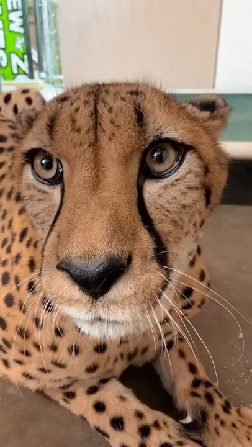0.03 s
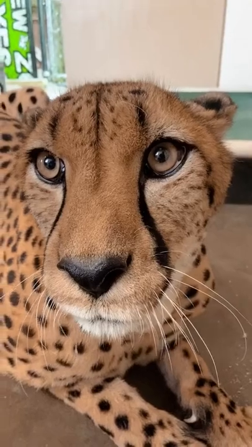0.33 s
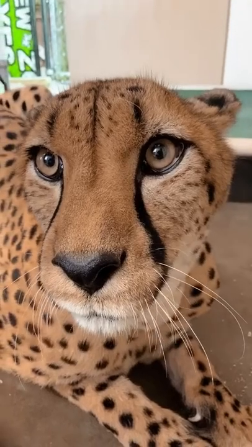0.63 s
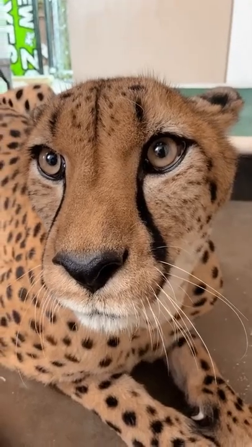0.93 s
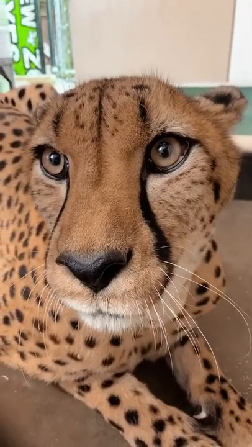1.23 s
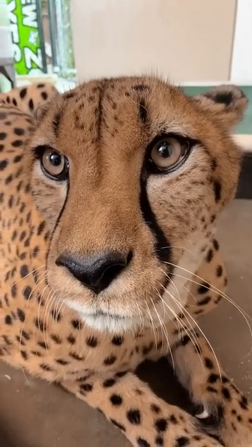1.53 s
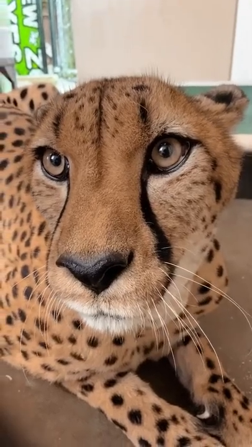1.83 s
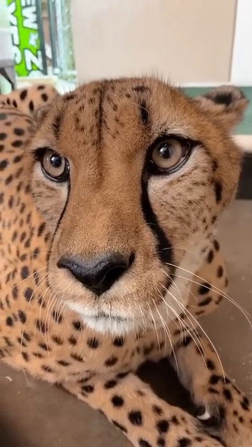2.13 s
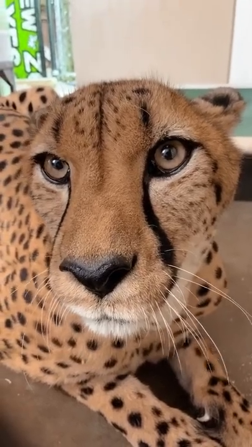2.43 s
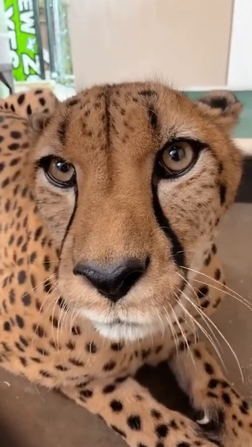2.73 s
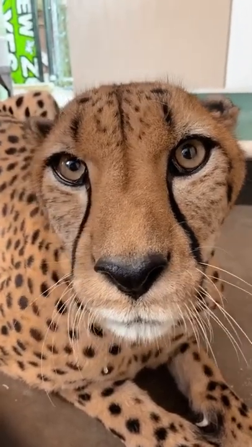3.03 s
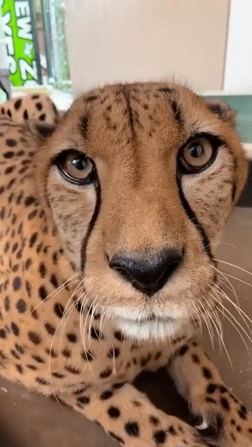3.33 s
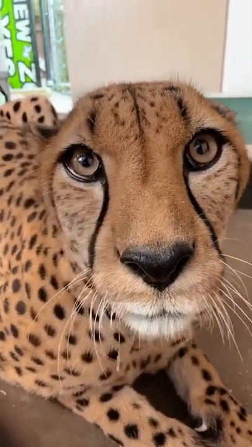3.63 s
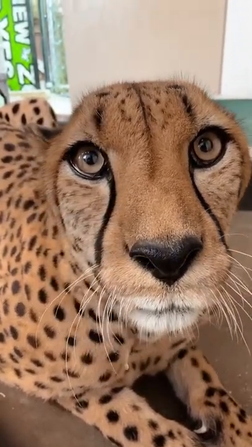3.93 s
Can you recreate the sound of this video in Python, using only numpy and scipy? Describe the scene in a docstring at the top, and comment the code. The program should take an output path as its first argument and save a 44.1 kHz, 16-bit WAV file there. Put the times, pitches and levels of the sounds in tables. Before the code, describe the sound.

A cheetah purrs close to the microphone in a quiet room, with rapid, low pulses. It starts on an in-breath, a hard, raspy rattle with small wet ticks. From about 0.7 seconds it breathes out in a softer flutter over a deep chest hum, slowly growing stronger. After a brief dip near 2.7 seconds, the brighter in-breath rattle returns and continues to the end at 4 seconds.

```python
"""Cheetah purring, close up

It breathes in, out for two seconds, and in again. The larynx snaps shut about 22 to 25 times
a second; each closure knocks the throat and chops the air into a puff. The in-breath is a
bright, hard rattle; the out-breath is a soft flutter over a deep chest hum."""
import sys
import numpy as np
from scipy import signal
from scipy.fft import rfft, irfft
from scipy.io import wavfile

SR = 44100
rng = np.random.default_rng(int(sys.argv[2]) if len(sys.argv) > 2 else 0)


def to_wav(sig):
    """Store sig (one row per channel, or 1-D mono) as 16-bit WAV at the path in sys.argv[1].

    Samples outside -1..1 are clipped; the rate is SR.
    """
    pcm = np.clip(np.atleast_2d(sig), -1, 1) * 32767
    pcm = np.round(pcm).astype(np.int16)
    wavfile.write(sys.argv[1], SR, pcm.T)  # frames by channels


N = 176400
TIME = np.arange(N) / SR
FIRST_CLOSURE_S = .0455

# larynx closure rate: time_s, rate_hz
PURR_RATE = [(0.0, 24.63), (0.178, 22.92), (0.227, 25.26), (0.413, 22.71), (0.449, 24.99), (0.705, 22.03),
             (0.95, 21.79), (1.032, 22.55), (1.168, 21.49), (1.62, 21.95), (2.003, 21.93), (2.304, 22.06),
             (2.6, 23.03), (2.665, 24.97), (2.956, 24.48), (3.3, 24.5), (3.65, 24.65), (4.0, 24.59)]
# chopped air, in-breath: time_s, level_db
AIR_IN = [(0, -42.5), (.38, -40.5), (0.462, -43.5), (0.639, -40), (0.721, -46), (0.782, -46), (.82, -65),
          (.95, -157), (2.779, -86.5), (2.831, -48), (2.972, -44.5), (3.199, -42), (3.4, -41),
          (3.552, -42.5), (4, -40.5)]


def from_db(db):
    """Decibels to gain."""
    return 10 ** (np.asarray(db) / 20)


def along(curve, time_s):
    """Curve value at the given times."""
    return np.interp(time_s, *np.transpose(curve))


def gains(spectrum, size=16384):
    """Rows of freq_hz, gain_db to gains on an even frequency grid."""
    freq_hz, gain_db = np.transpose(spectrum)
    grid_hz = np.maximum(np.arange(size // 2 + 1) * SR / size, 1)
    return from_db(np.interp(np.log(grid_hz), np.log(freq_hz), gain_db))


def minimum_phase(gain):
    """Promptest impulse response with these gains."""
    cepstrum = irfft(np.log(gain))
    half = len(cepstrum) // 2
    cepstrum[1:half] *= 2
    cepstrum[half + 1:] = 0
    return irfft(np.exp(rfft(cepstrum)))[:half]


def resonate(drive, spectrum):
    """Ring a body with these resonances, at unit impulse energy."""
    response = minimum_phase(gains(spectrum))
    return signal.fftconvolve(drive, response / np.linalg.norm(response))[:N]


def onset():
    """Fade-in just before the first closure."""
    return np.clip(2 * TIME / FIRST_CLOSURE_S - 1, 0, 1) ** 2


def larynx(jitter_s=.00037):
    """Running cycle count and the slightly uneven times at which the folds shut."""
    cycles = np.cumsum(along(PURR_RATE, TIME)) / SR
    cycles -= np.interp(FIRST_CLOSURE_S, TIME, cycles)
    closures_s = np.interp(np.arange(int(cycles[-1]) + 1), cycles, TIME)
    return cycles, closures_s + jitter_s * rng.standard_normal(len(closures_s))


def knocks(times_s, level, body, spread_db, pitch_shift=0):
    """One strike per time; pitch_shift (a fraction) leaves the body randomly slacker or tighter."""
    level_db = along(level, times_s) + spread_db * rng.standard_normal(len(times_s))
    strength = -from_db(level_db) * np.sqrt(SR / along(PURR_RATE, times_s))
    tunings = np.unique([1 - pitch_shift, 1, 1 + pitch_shift])
    chosen = rng.integers(0, len(tunings), len(times_s))
    samples = np.clip((times_s * SR).astype(int), 0, N - 1)
    out = 0
    for k, tuning in enumerate(tunings):
        clicks = np.zeros(N)
        clicks[samples] = strength * (chosen == k)
        out += resonate(clicks, np.array(body) * [tuning, 1])
    return out


def turbulence(flow, airway, side_db=-14):
    """Noise that follows the flow and rings the airway; stereo."""
    mid, side = (resonate(flow * white, airway) for white in rng.standard_normal((2, N)))
    return mid + from_db(side_db) * side * np.array([[1], [-1]])


def puffs(closures_s, level, shape, nose, spread_db=2, rasp_db=3, rasp_hz=1100):
    """Raspy nasal air: a puff at each closure, a leak between, a weak puff on reopening."""
    reopen_s, reopen_width_s = .0205, .004
    nearest = np.searchsorted((closures_s[1:] + closures_s[:-1]) / 2, TIME)
    previous = np.maximum(np.searchsorted(closures_s, TIME) - 1, 0)
    from_peak_s = TIME - closures_s[nearest] - shape['lag_s']
    from_reopen_s = TIME - closures_s[previous] - reopen_s
    slope_s = np.where(from_peak_s < 0, shape['swell_s'], shape['fade_s'])
    strength = from_db(spread_db * rng.standard_normal(len(closures_s)))[nearest]
    gate = strength * np.exp(-np.abs(from_peak_s) / slope_s) + from_db(shape['leak_db'])
    gate += from_db(shape['reopen_db']) * np.exp(-(from_reopen_s / reopen_width_s) ** 2)
    grain = np.interp(TIME * rasp_hz, np.arange(N), rng.standard_normal(N))
    gate *= from_db(rasp_db * grain)
    gate /= np.sqrt(np.mean(gate ** 2))
    return turbulence(gate * from_db(along(level, TIME)) * onset(), nose)


def breath_in(closures_s, touch_lead_s=.0029, tick_lag_s=.003):
    """Hard rattle: the folds touch lightly, shut, and end in a wet tick amid puffs of air."""
    # throat knocks: time_s, level_db
    knock_level = [(0, -28.5), (0.301, -27), (.59, -28), (.64, -32.5), (.69, -38.5), (0.804, -57),
                   (2.782, -65.5), (2.827, -35.5), (2.88, -30), (2.95, -27.5), (3.001, -32.5), (3.071, -26),
                   (3.35, -26.5), (3.57, -26), (3.69, -30), (3.851, -26.5), (4, -26.5)]
    # resonances: freq_hz, gain_db
    throat = [(100, -38), (215, -22), (285, -4.5), (355, 4), (430, -5), (520, -22.5), (660, -15),
              (780, -16.5), (920, -38), (1070, -28), (1500, -71), (2500, -82.5), (6000, -100)]
    nose = [(200, -14.5), (350, -2), (510, 15.5), (640, 14.5), (770, 17), (900, 2), (1070, 7.5),
            (1200, -0.5), (1450, -4), (1750, 1.5), (1950, 10.5), (2200, -2.5), (2750, -5.5), (3250, -8.5),
            (3570, 0), (3850, -12), (4180, -0.5), (4450, -10), (4900, -29), (5700, -22), (6900, -46.5),
            (7900, -42), (9000, -44), (10600, -29.5), (12600, -34), (14000, -40.5)]
    # puff envelope: lag_s, swell_s, fade_s, leak_db, reopen_db
    puff_shape = dict(lag_s=.0025, swell_s=.0055, fade_s=.0026, leak_db=-23.5, reopen_db=-21)
    rattle = knocks(closures_s, knock_level, throat, spread_db=.7, pitch_shift=.022)
    touches = from_db(-11) * knocks(closures_s - touch_lead_s, knock_level, throat, spread_db=.7)
    ticks = from_db(-10) * knocks(closures_s + tick_lag_s, AIR_IN, nose, spread_db=5)
    wet = ticks + crackle(closures_s) + smacks()
    return rattle + touches + wet + puffs(closures_s, AIR_IN, puff_shape, nose)


def breath_out(closures_s, lag_s=.0012):
    """Soft flutter: weaker knocks and puffs, the folds shutting a little late."""
    # throat knocks: time_s, level_db
    knock_level = [(.62, -59.5), (.68, -40.5), (0.767, -36), (.82, -49.5), (.86, -48.5), (0.913, -42),
                   (.95, -57), (1, -44), (1.077, -39.5), (1.23, -43), (1.453, -42.5), (1.55, -40.5),
                   (1.75, -40.5), (2.199, -38), (2.629, -37.5), (2.702, -53.5), (2.84, -60)]
    # chopped air: time_s, level_db
    air_level = [(.7, -96), (0.801, -50.5), (0.871, -58.5), (.95, -69.5), (1.09, -64), (1.299, -58),
                 (1.55, -56.5), (2, -52.5), (2.301, -48.5), (2.66, -49.5), (2.70, -68.5), (2.8, -74),
                 (2.852, -83)]
    # resonances: freq_hz, gain_db
    throat = [(100, -21), (230, -9), (300, 6.5), (370, 5), (440, -6.5), (570, -12.5), (680, -17),
              (765, -9.5), (860, -18), (975, -31), (1080, -22.5), (1350, -36.5), (1650, -39.5), (1870, -26),
              (1975, -25), (2100, -35.5), (2300, -47), (2900, -53.5), (3800, -50), (4400, -72.5),
              (8000, -100.5)]
    nose = [(200, -3.5), (350, 18), (560, 6.5), (680, 4.5), (765, 10.5), (960, -5.5), (1100, 4.5),
            (1400, -2.5), (1750, -2), (1975, 10), (2230, -13), (2550, -6), (2850, -15.5), (3500, -6),
            (3900, -7.5), (4150, -25), (4500, -31), (5600, -32), (7000, -45), (12000, -45.5)]
    # puff envelope: lag_s, swell_s, fade_s, leak_db, reopen_db
    puff_shape = dict(lag_s=0, swell_s=.0014, fade_s=.004, leak_db=-19, reopen_db=-12)
    flutter = knocks(closures_s + lag_s, knock_level, throat, spread_db=.7, pitch_shift=.022)
    return flutter + puffs(closures_s, air_level, puff_shape, nose)


def chest_hum(cycles):
    """Deep hum locked to the purr, mainly its third harmonic."""
    # hum strength: time_s, level_db
    level = [(0, -40), (.62, -46), (.69, -29), (.77, -26), (.88, -29.5), (.99, -45.5), (1.08, -36),
             (1.35, -32), (1.65, -27.5), (1.87, -29.5), (2, -28.5), (2.35, -28), (2.56, -31.5), (2.64, -28),
             (2.7, -38), (2.85, -41.5), (3, -45), (4, -47)]
    # hum lines: purr_harmonic, gain_db
    lines = [(3, 1), (6, -19.5), (8, -18.5)]
    hum = sum(from_db(gain_db) * np.cos(2 * np.pi * harmonic * cycles) for harmonic, gain_db in lines)
    return -np.sqrt(2) * hum * from_db(along(level, TIME)) * onset()


def chest_wall(closures_s, thump_lag_s=.0025, rebound_lag_s=.02307):
    """The wall thumps on closure, rebounds on reopening and rumbles irregularly."""
    # thumps: time_s, level_db
    level = [(0, -42), (0.698, -42.5), (0.968, -46), (1.149, -38), (1.5, -36.5), (1.922, -36.5),
             (2.021, -38), (2.401, -41.5), (2.5, -33.5), (2.64, -32.5), (2.722, -43.5), (2.898, -41),
             (4, -40)]
    # chest resonances: freq_hz, gain_db
    body = [(12, -36), (30, -18), (45, 2), (70, 10), (100, 5.5), (130, 4.5), (175, 4.5), (215, -10),
            (260, -10), (500, -79.5)]
    effort_db = along(level, TIME)
    rumble_db = -42.5 + .5 * (effort_db - effort_db.mean())
    rumble = resonate(rng.standard_normal(N), body) * from_db(rumble_db) * onset()
    thumps = knocks(closures_s + thump_lag_s, level, body, spread_db=1)
    rebounds = from_db(-7) * knocks(closures_s + rebound_lag_s, level, body, spread_db=1)
    return rumble + thumps + rebounds


def smacks(swell_s=.0014, fade_s=.0026):
    """Brief, bright, wet bursts on the hardest closures."""
    # bursts: peak_s, level_db
    bursts = [(0.0478, -22.5), (0.1743, -23.5), (0.2987, -23.5), (0.381, -26), (0.633, -32.5),
              (0.771, -34.5), (2.873, -37.5), (2.999, -25.5), (3.157, -31.5), (3.3638, -25.5), (3.444, -25),
              (3.486, -41), (3.566, -32.5), (3.686, -30.5), (3.728, -26), (3.888, -37.5)]
    # smack colour: freq_hz, gain_db
    tone = [(300, -7.5), (740, 25.5), (1100, 0.5), (1500, 1.5), (1970, 17.5), (2350, -3.5), (3500, 3.5),
            (4300, 7), (5000, -14), (7000, -26.5), (8200, -16.5), (9200, -24.5), (10700, -12.5),
            (12600, -21), (14000, -33)]
    flow = 0
    for peak_s, level_db in bursts:
        decay = np.abs(TIME - peak_s) / np.where(TIME < peak_s, swell_s, fade_s)
        flow += from_db(level_db) * np.exp(-np.minimum(decay, 20))
    return turbulence(flow, tone)


def crackle(closures_s, lead_s=.001, scatter_s=.0022):
    """Saliva: two tiny snaps of varying pitch around each in-breath closure."""
    # snap colour: freq_hz, gain_db
    tone = [(400, -14), (1100, -2), (2000, 1.5), (2700, 1), (4000, 3.5), (4900, -9.5), (5700, -7.5),
            (7000, -29.5), (9000, -28), (10800, -16), (12600, -18.5), (14000, -21.5)]
    snaps_s = closures_s - lead_s + scatter_s * rng.standard_normal((2, len(closures_s)))
    snaps = sum(knocks(times_s, AIR_IN, tone, spread_db=4, pitch_shift=.09) for times_s in snaps_s)
    return from_db(-23) * snaps


def throat_ring(voice):
    """A narrow throat resonance outlasts each knock; stereo, levels relative to the voice."""
    # ringing mode: pitch_hz, t60_s, left_db, right_db
    modes = [(371.8, 0.46, -23, -13)]
    t = TIME[:SR // 2]
    out = 0
    for pitch_hz, t60_s, left_db, right_db in modes:
        response = np.cos(2 * np.pi * pitch_hz * t) * from_db(-60 * t / t60_s)
        ring = signal.fftconvolve(voice, response)[:N]
        out += from_db([[left_db], [right_db]]) * ring * np.std(voice) / np.std(ring)
    return out


def throat_growl():
    """Air rumbles on in the throat between knocks."""
    # airflow: time_s, level_db
    level = [(0, -39.5), (.55, -38), (.66, -37.5), (.82, -42), (.9, -48.5), (1.0, -49.5), (1.5, -51),
             (2.1, -47), (2.65, -46.5), (2.76, -54.5), (2.95, -40), (3.3, -36.5), (4, -40)]
    # growl colour: freq_hz, gain_db
    tone = [(120, -33.5), (250, -8), (310, 1), (370, -0.5), (450, -4.5), (560, -14.5), (780, -18),
            (950, -33.5), (1500, -39.5), (4000, -69)]
    return turbulence(onset() * from_db(along(level, TIME)), tone)


def nostril_hiss():
    """Faint hiss at the nostrils, swelling with each breath."""
    # airflow: time_s, level_db
    level = [(0, -88.5), (.7, -92), (.95, -102), (1.5, -89), (2.2, -84.5), (2.62, -87), (2.75, -102),
             (3, -92.5), (4, -81.5)]
    # hiss colour: freq_hz, gain_db
    tone = [(3000, -10), (4200, 3), (5500, -2.5), (7000, -13.5), (9300, -3.5), (10500, -7), (11400, -4.5),
            (11900, 6.5), (12400, -4), (13500, -7)]
    return turbulence(onset() * from_db(along(level, TIME)), tone)


def place_head(voice):
    """Pan by frequency, mostly a little to the right."""
    # balance: freq_hz, left_minus_right_db
    balance = [(100, 0.5), (240, 0.6), (400, -4), (750, -5.5), (1170, -4.5), (1900, -1), (5000, -2),
               (9000, 1)]
    lean = np.sqrt(gains(balance))
    responses = np.array([minimum_phase(lean), minimum_phase(1 / lean)])
    return signal.fftconvolve(voice, responses, axes=1)[:, :N]


def room(source, t60_s=.2, gap_s=.005, level_db=-15):
    """Short, weak reflections, different at each ear."""
    t = TIME[:SR // 2]
    tails = rng.standard_normal((2, len(t))) * from_db(-60 * t / t60_s) * (t > gap_s)
    tails /= np.linalg.norm(tails, axis=1, keepdims=True)
    return from_db(level_db) * signal.fftconvolve(source, tails, axes=1)[:, :N]


def background(level_db=-66):
    """Quiet, dull, steady noise; stereo."""
    # noise colour: freq_hz, gain_db
    tone = [(20, -4), (100, 0.5), (300, 1), (1000, 1), (3000, -18), (6000, -32.5), (13000, -32.5)]
    return from_db(level_db) * np.array([resonate(white, tone) for white in rng.standard_normal((2, N))])


def scene():
    """Head slightly right, chest centred, a quiet room around them."""
    cycles, closures_s = larynx()
    voice = breath_in(closures_s) + breath_out(closures_s) + throat_growl() + nostril_hiss()
    head = place_head(voice)
    ambience = background() + room(head)
    chest = chest_hum(cycles) + chest_wall(closures_s)
    return head + throat_ring(voice.mean(axis=0)) + chest + ambience


def record(dry, port_lag_s=.000023, cutoff_hz=13400):
    """Sound reaches the right microphone port just after the left; steep low-pass."""
    ports = np.array([dry[0], np.interp(TIME - port_lag_s, TIME, dry[1])])
    return signal.sosfilt(signal.ellip(10, .1, 80, cutoff_hz, fs=SR, output="sos"), ports)


dry = scene()
out = record(dry)
to_wav(out)
```